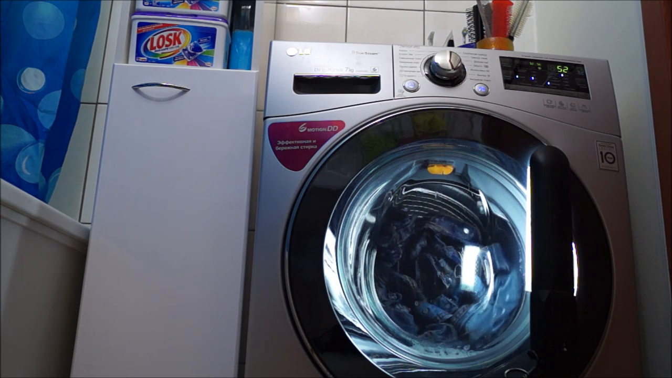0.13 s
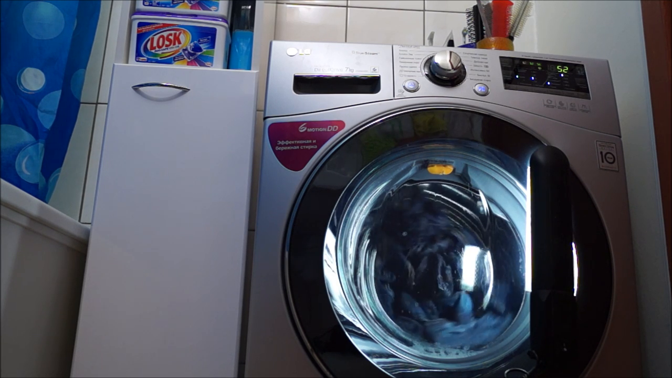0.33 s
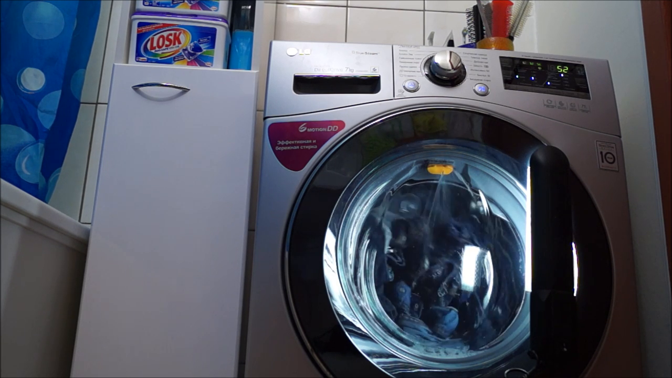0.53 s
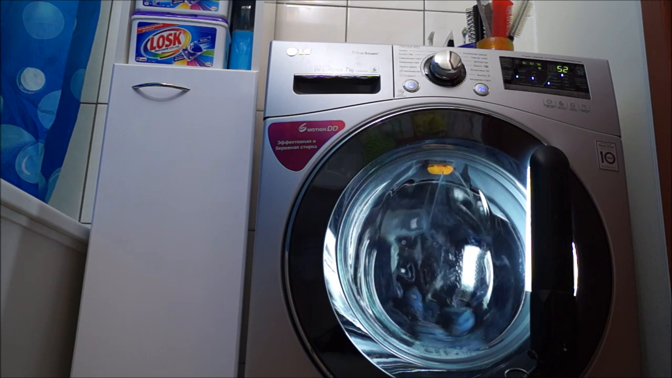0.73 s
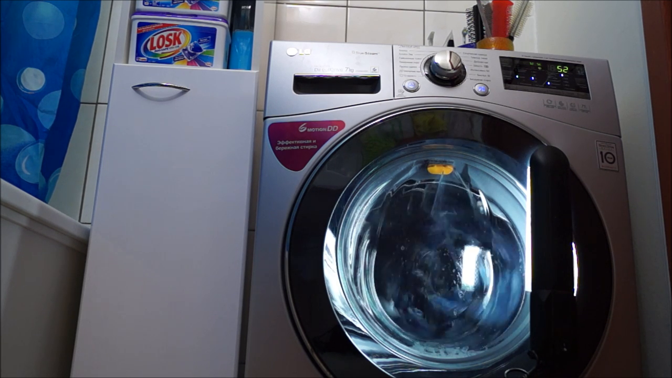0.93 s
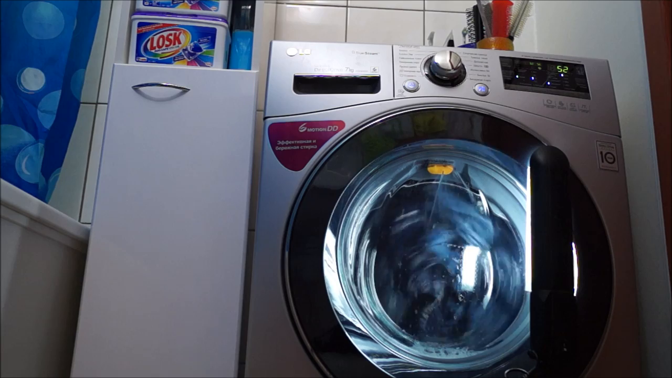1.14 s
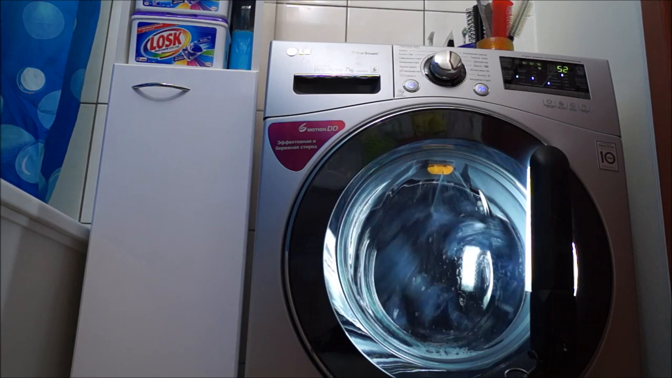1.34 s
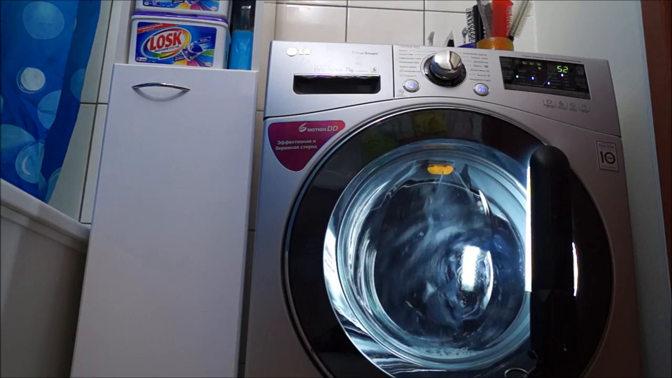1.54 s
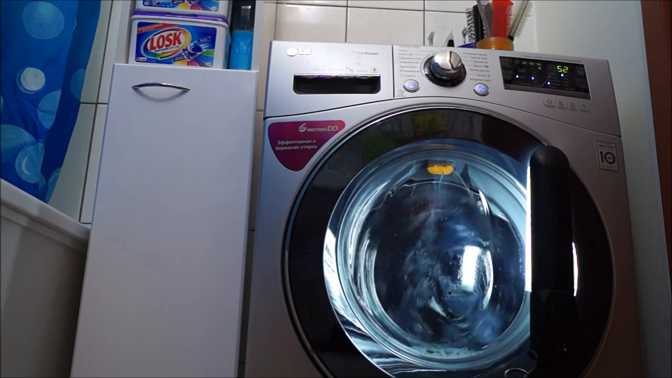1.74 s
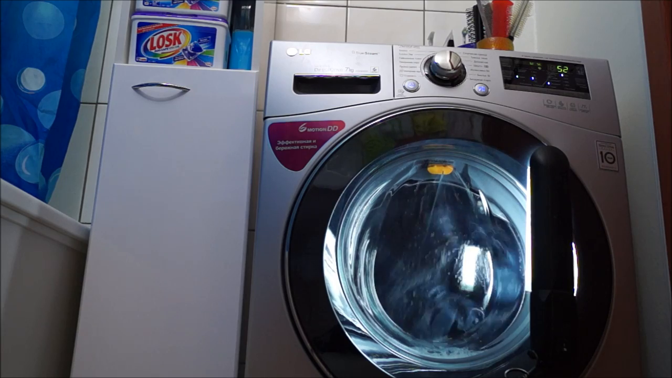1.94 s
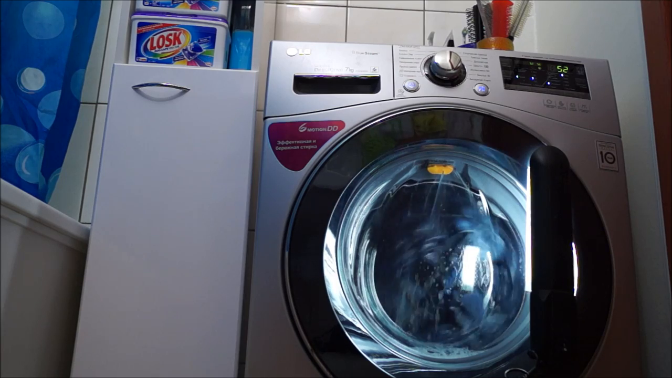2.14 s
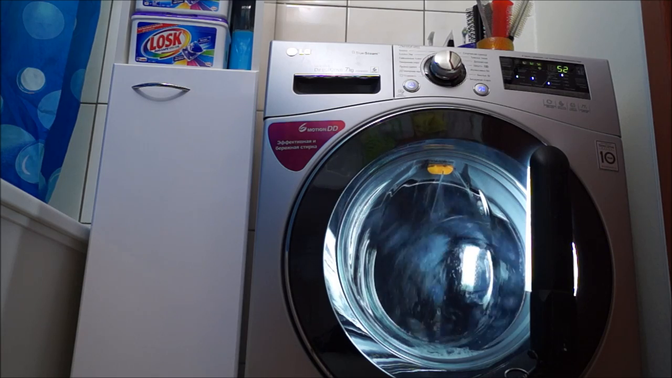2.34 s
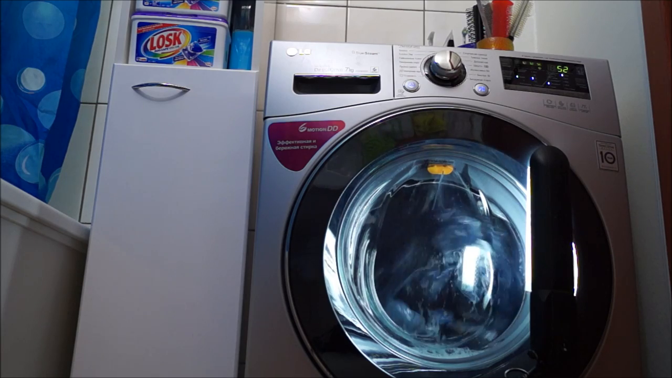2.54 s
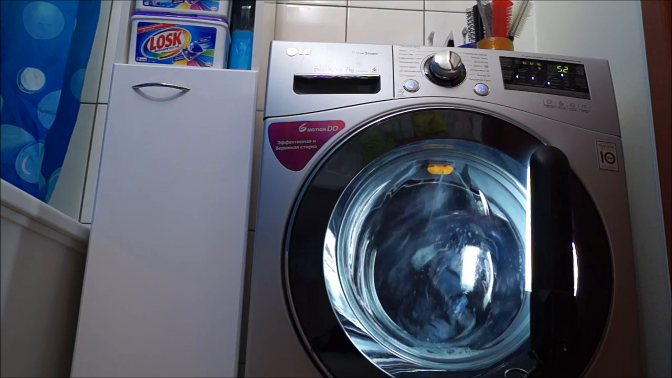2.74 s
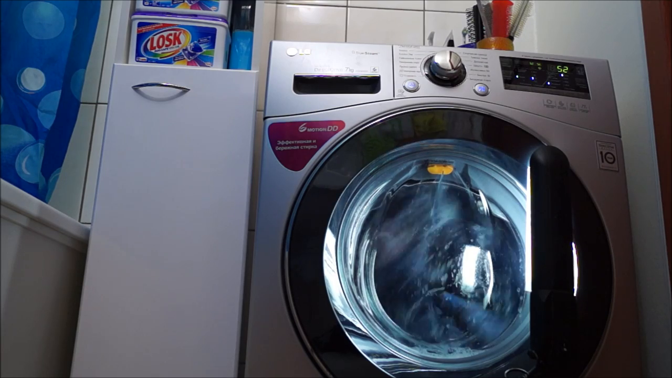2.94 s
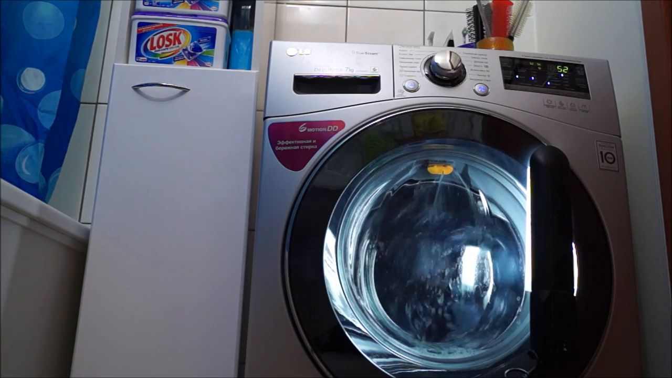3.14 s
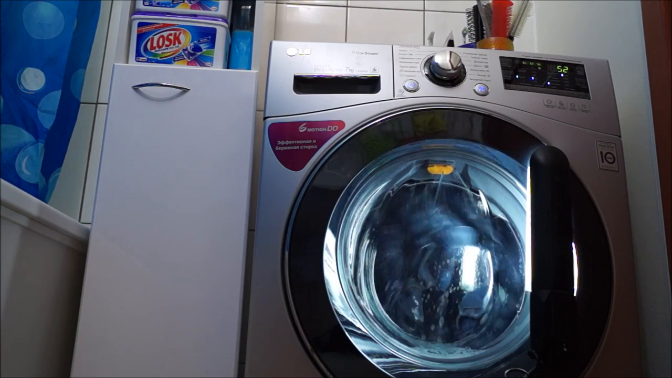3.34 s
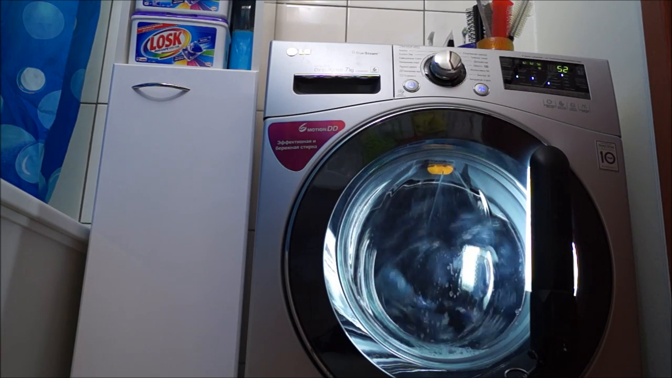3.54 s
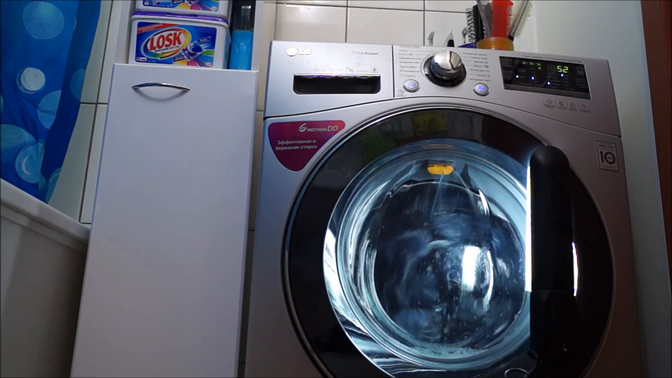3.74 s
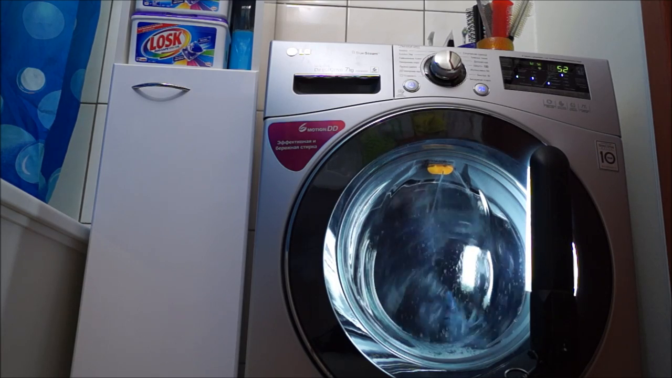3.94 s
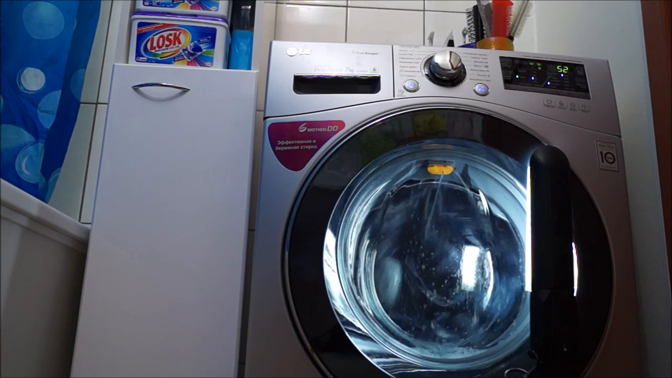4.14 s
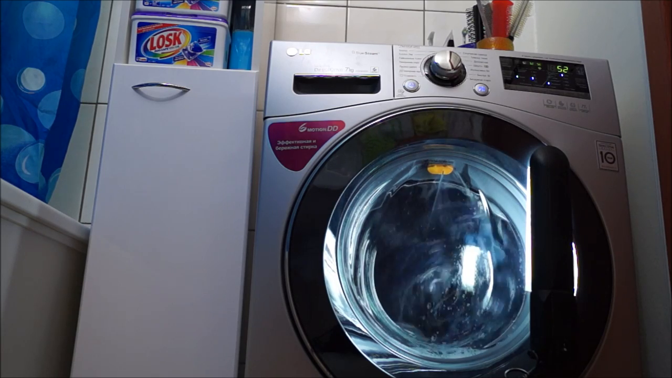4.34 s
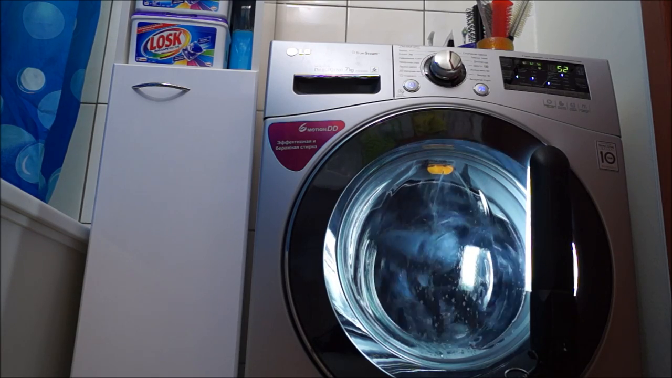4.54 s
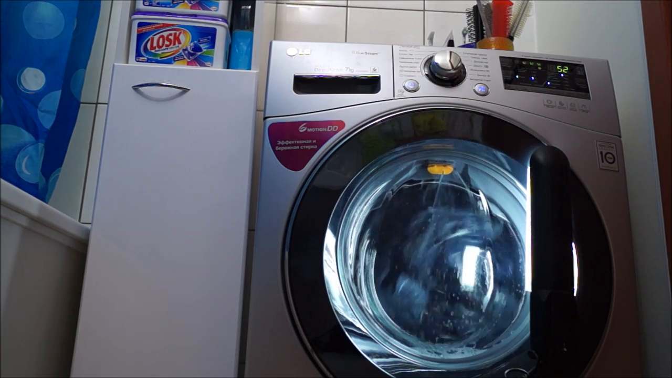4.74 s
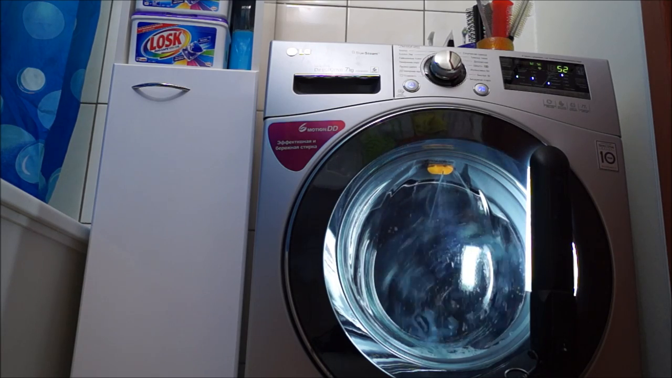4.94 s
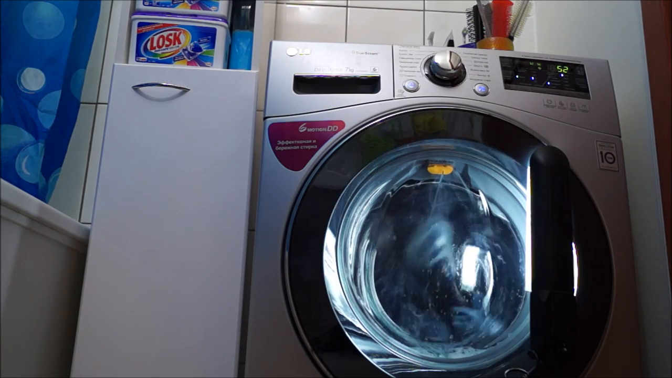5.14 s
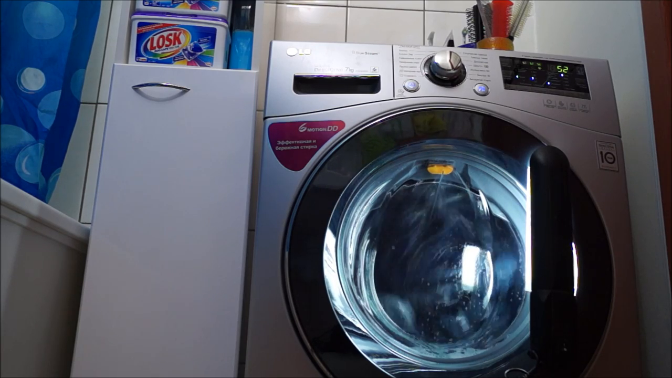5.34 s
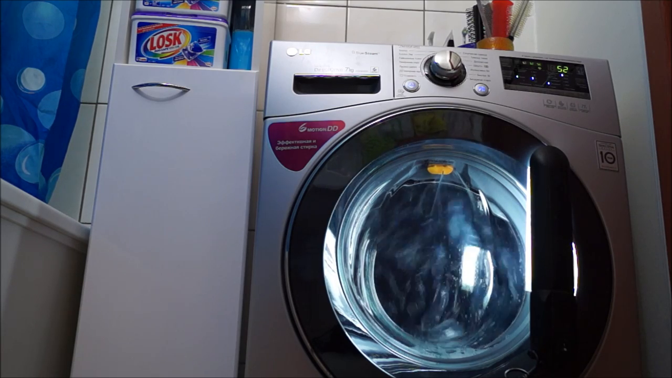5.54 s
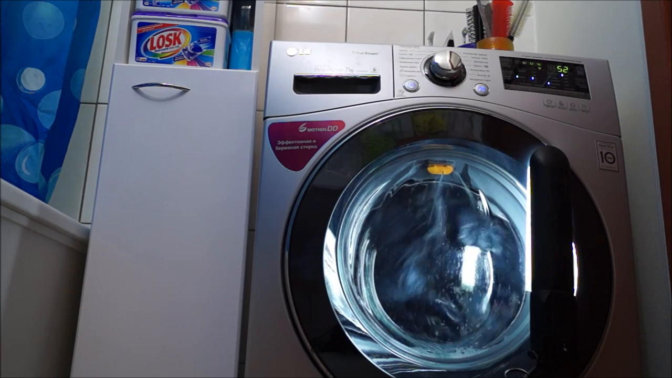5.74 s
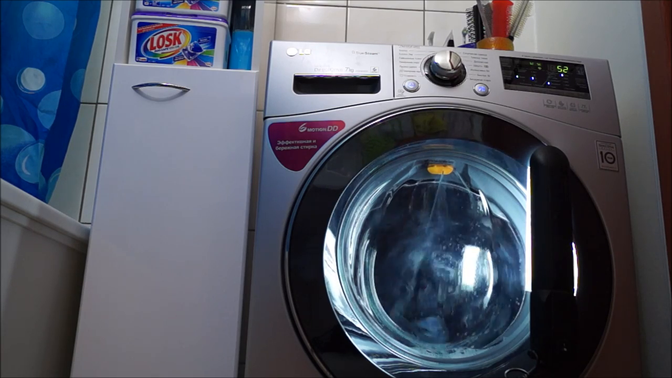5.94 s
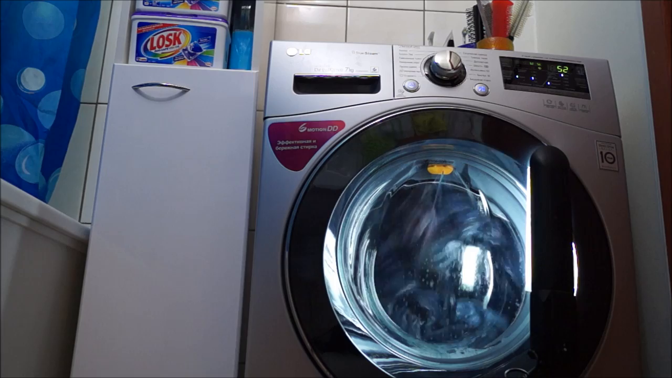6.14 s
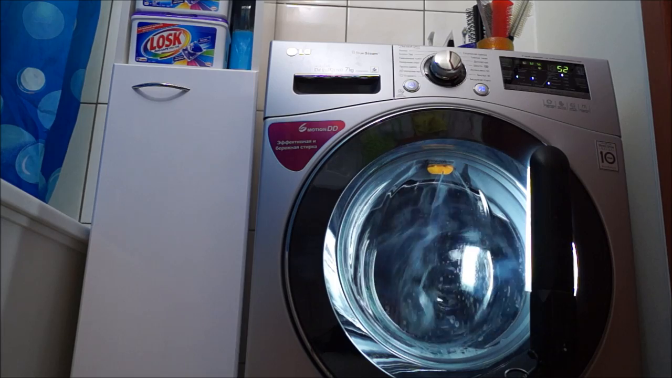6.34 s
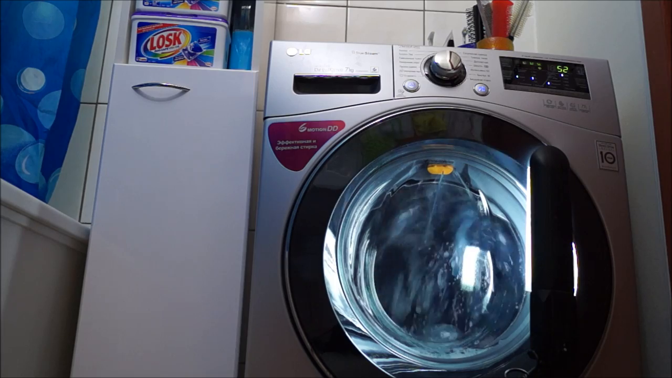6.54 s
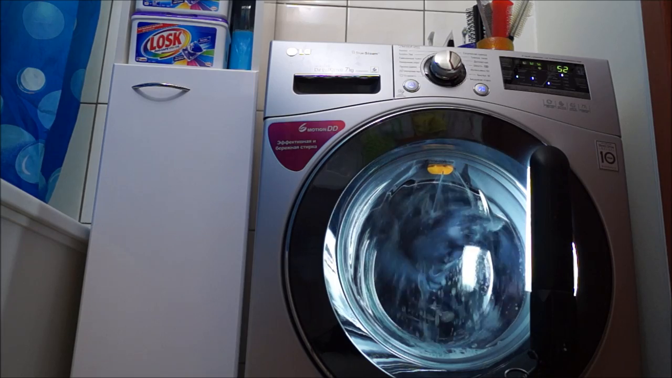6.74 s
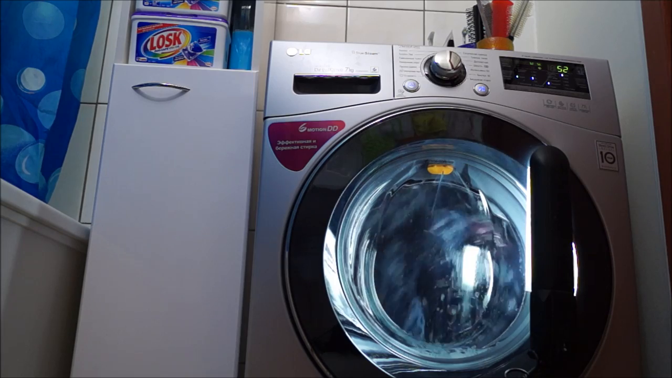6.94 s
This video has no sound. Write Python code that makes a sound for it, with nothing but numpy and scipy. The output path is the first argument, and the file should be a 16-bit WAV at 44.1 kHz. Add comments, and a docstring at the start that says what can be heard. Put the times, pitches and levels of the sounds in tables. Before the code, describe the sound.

A front-loading washing machine clacks into motion, then hums and rumbles as wet laundry thuds and sloshes, with two sharp rattling clicks on the door glass.

```python
"""A front-loading washing machine starts to tumble its load in a small tiled bathroom, heard on two microphones.
First the drum clacks and the load scrapes over the steel: noise bursts and dense slips, coloured by the drum.
As it gets going, a mains pump hums in harmonics, the drive drones as a labouring tone and noise rumbles
the tub's resonances; bundles thud down as dull bursts, while water made of noise and ringing bubbles trickles
and spray builds up. Later a metal fastener chatters on the door glass, a rattle that rings the pane's modes."""
import sys
import numpy as np
from scipy import signal
from scipy.fft import rfft, irfft, next_fast_len
from scipy.io import wavfile
from scipy.ndimage import map_coordinates

SR = 44100
rng = np.random.default_rng(int(sys.argv[2]) if len(sys.argv) > 2 else 0)


def output_pcm(signal):
    """Save a mono or channel-first signal as 16-bit PCM at the path in sys.argv[1].

    Samples are clipped to [-1, 1] before scaling.
    """
    pcm = np.clip(np.atleast_2d(signal).T, -1, 1) * 32767
    wavfile.write(sys.argv[1], SR, np.round(pcm).astype(np.int16))


N = 308259
TIME = np.arange(N) / SR

# spectrum of water sloshing through cloth: f/Hz, relative level/dB
SLOSH_COLOUR = [(300, -7), (600, 5.5), (900, 3.5), (1200, -2), (1700, -3.5), (2300, -11), (3200, -16),
                (5000, -16.5), (11000, -41)]
# spectrum of a heavy, dull blow on the machine: f/Hz, relative level/dB
THUD_COLOUR = [(35, -41), (70, -12), (105, -6), (150, -4.5), (230, -2.5), (305, 4.5), (370, -3.5), (430, 3),
               (530, 0.5), (640, -12.5), (900, -17.5), (2000, -35)]
# modes of the door glass: f/Hz, width/Hz, relative level struck at rim/dB, at centre/dB
GLASS = [(1495, 90, 0, -1.5), (1810, 59, 0, 0), (2270, 59, 7, 10), (2414, 84, -6, 7.5),
         (2600, 150, -5, -2.5), (3460, 130, -7, 10), (3585, 190, -9, 8), (3930, 220, -1, -1),
         (4350, 220, 5.5, -16), (4850, 200, 9.5, 6.5), (5100, 250, 9, 3.5), (5790, 120, 4, 6),
         (6000, 220, 5.5, 4), (6780, 190, 1.5, -10), (7450, 260, 3, 1), (7750, 200, 1, 1),
         (8800, 380, -8, -0.5), (9240, 200, 6.5, 1), (9430, 330, -2, -8), (10180, 280, -1, -0.5)]
# broad crack of the casing under the glass: f/Hz, relative level/dB
CRACK = [(400, -6), (900, 4), (1500, 7.5), (3000, 6.5), (5000, 9.5), (8000, 5.5), (11000, -3.5)]


def from_db(db):
    """Decibels to an amplitude factor."""
    return 10 ** (np.asarray(db) / 20)


def rms_one(x):
    """Scale to an RMS of one."""
    return x / np.sqrt(np.mean(x ** 2) + 1e-20)


def in_time(rows):
    """Each column of a curve at every sample."""
    s, *columns = np.transpose(rows)
    return [np.interp(TIME, s, c) for c in columns]


def at_hz(points, hz):
    """Read a spectrum on a log-frequency axis."""
    f, value = np.transpose(points)
    return np.interp(np.log(np.maximum(hz, 1)), np.log(f), value)


def drift(rate):
    """Smooth chance of spread 1, drawn through `rate` random points a second."""
    knots = rng.standard_normal(2048)
    coarse_time = TIME[::64]
    coarse = map_coordinates(knots, [coarse_time * rate], mode="wrap")
    return np.interp(TIME, coarse_time, rms_one(coarse))


def swell(middle, length, squareness=2):
    """A smooth rise and fall, above half its height for `length` seconds; the squarer, the flatter its top."""
    distance = np.minimum(np.abs(2 * (TIME - middle) / length), 8)
    return .5 ** distance ** squareness


def colour(x, spectrum):
    """Causal (minimum-phase) filter with the given spectrum."""
    size = 2 * next_fast_len(x.shape[-1] // 2 + 2048, real=True)
    gain = from_db(at_hz(spectrum, np.fft.rfftfreq(size, 1 / SR)))
    # folding the cepstrum onto positive time makes the phase minimal
    cepstrum = irfft(np.log(gain))
    cepstrum[1:size // 2] *= 2
    cepstrum[size // 2 + 1:] = 0
    return irfft(rfft(x, size) * np.exp(rfft(cepstrum)))[..., :x.shape[-1]]


def soften(x, cut_hz):
    """Second-order low-pass."""
    return signal.sosfilt(signal.butter(2, min(cut_hz, SR * .45), fs=SR, output="sos"), x)


def resonate(x, modes):
    """Parallel resonances of alternating sign."""
    out = 0
    for k, (hz, width, db) in enumerate(modes):
        r = np.exp(-np.pi * width / SR)
        top = (-1) ** k * from_db(db) * (1 - r * r) / 2
        bottom = [1, -2 * r * np.cos(2 * np.pi * hz / SR), r * r]
        out = out + signal.lfilter([top, 0, -top], bottom, x + 1e-18)
    return out


def drone(hz, gain, rough):
    """A tone of RMS `gain` with a slight tremor."""
    tremor = 1 + rough * drift(35)
    return gain * tremor * np.sqrt(2) * np.sin(2 * np.pi * np.cumsum(hz) / SR)


def burst(length):
    """A dense flurry of contacts that excites all pitches alike and fades over about `length` seconds."""
    fade = from_db(-60 * TIME[:SR // 3] / length)
    spectrum = rfft(rng.standard_normal((2, len(fade))) * fade)
    flat = irfft(spectrum / np.abs(spectrum), len(fade))
    return flat * np.minimum(10 * fade, 1)


def add(track, s, db, sound):
    """Place a sound whose energy equals that of 20 ms at the given level."""
    at = int(max(s, 0) * SR)
    energy = np.sum(sound ** 2, axis=-1, keepdims=True) / (SR / 50)
    track[:, at:at + sound.shape[-1]] += (from_db(db) * sound / np.sqrt(energy))[:, :N - at]


def blows(table, spectrum, rise_share):
    """Blows on one body, each building up over a share of its length: the softer the contact, the duller."""
    out = np.zeros((2, N))
    for s, db, length, cut_hz in table:
        contact = burst(length)
        rise = np.minimum(TIME[:contact.shape[-1]] / (rise_share * length), 1) ** 2
        add(out, s, db, soften(colour(contact * rise, spectrum), cut_hz))
    return out


def bathroom(x, wet_db, t60):
    """Direct sound and a dense tail from the tiled walls, dying away by 60 dB in `t60` seconds."""
    t = TIME[:SR // 2]
    onset = np.clip((t - .004) / .006, 0, 1)
    tail = rng.standard_normal((2, len(t))) * from_db(-60 * t / t60) * onset
    tail /= np.sqrt(np.sum(tail ** 2, axis=-1, keepdims=True))
    return x + from_db(wet_db) * signal.fftconvolve(x[:1], tail, axes=-1)[:, :N]


def spread(pair):
    """Two unrelated signals become left and right, nearly alike in the bass."""
    # likeness of the two microphone channels: f/Hz, likeness/0-1
    likeness = [(50, 0.93), (110, 1), (200, 0.93), (300, 0.93), (500, 0.77), (1000, 0.53), (2000, 0.63),
                (4000, 0.62), (9000, 0.7)]
    size = next_fast_len(pair.shape[-1], real=True)
    mid, side = rfft(pair, size)
    alike = np.clip(at_hz(likeness, np.fft.rfftfreq(size, 1 / SR)), 0, 1)
    shared = np.sqrt((1 + alike) / 2) * mid
    opposed = np.sqrt((1 - alike) / 2) * side * [[1], [-1]]
    return irfft(shared + opposed, size)[:, :pair.shape[-1]]


def pump(waver, flutter_db):
    """Mains-locked pump; the uneven water load wavers every harmonic, and a whine just above one beats with it."""
    # pump hum: multiple of the mains, median level/dB
    harmonics = [(1, -72.5), (2, -54.5), (3, -60.5), (4, -59), (6, -51.5), (7, -59), (8, -53), (9, -55.5),
                 (10, -57.5), (11, -59)]
    # whine against the pump's harmonic: t/s, beats per second/Hz
    beat_rate = [(0, 3.8), (2.1, 4.5), (4.2, 4.6), (4.3, 2.15), (7, 2.15)]
    mains_hz, beat_multiple, first_beat_s = 50, 8, .33
    whine_db, whine_flutter_db = -51.5, 6
    beats = np.cumsum(in_time(beat_rate)[0]) / SR
    beats = beats - np.interp(first_beat_s, TIME, beats)
    out = 0
    for multiple, db in harmonics:
        turns = round(multiple) * mains_hz * TIME + rng.random()
        phase = 2 * np.pi * turns + waver * drift(5)
        out = out + from_db(db + flutter_db * drift(12)) * np.sin(phase)
        if round(multiple) == beat_multiple:
            whine_gain = from_db(whine_db + whine_flutter_db * drift(7))
            out = out + whine_gain * np.sin(phase + 2 * np.pi * beats)
    return np.sqrt(2) * out


def singing_panels():
    """The churning water keeps two narrow panel resonances wavering."""
    # cabinet panels beside strong pump tones: f/Hz, width/Hz, relative level/dB
    panel_modes = [(300.3, 15.4, 0.5), (407.8, 13.8, 3)]
    wide_modes = [(hz, 5 * width, 0) for hz, width, db in panel_modes]
    churn = resonate(resonate(rng.standard_normal(N), panel_modes), wide_modes)
    return from_db(-48) * rms_one(churn)


def bubbles(per_s, size_db, cycles, count=18):
    """Bubbles of many pitches pop in clumps and ring for a few cycles."""
    sizes = from_db(size_db * np.minimum(rng.exponential(1, N), 4)) * rng.choice([-1, 1], N)
    pops = sizes * (rng.random(N) < per_s * from_db(4 * drift(8)) / SR)
    dealt = rng.integers(0, count, N)  # which pitch each pop rings
    rings = 0
    for k, hz in enumerate(np.geomspace(700, 3600, count)):
        rings = rings + resonate(pops * (dealt == k), [(hz, hz / cycles, at_hz(SLOSH_COLOUR, hz))])
    return rms_one(rings)


def water(slosh_db, spray_db, running):
    """Water surges through the cloth while fine spray hisses and patters on the glass."""
    # spectrum of spray on the glass: f/Hz, relative level/dB
    spray_colour = [(1000, -33), (2500, 6.5), (3300, 3), (4500, 3.5), (6000, 1), (8000, 1), (10500, -1.5),
                    (13000, -38)]
    slosh = rms_one(colour(rng.standard_normal((2, N)), SLOSH_COLOUR)) * from_db(1.68 * drift(16))
    pops = bubbles(per_s=500, size_db=3.0, cycles=15.3) * np.array([[1], [0]])
    fizz = bathroom(pops, wet_db=4.5, t60=0.19)
    drops = rng.standard_normal((2, N)) * (rng.random(N) < 120 / SR)  # 120 a second
    patter = rms_one(colour(bathroom(drops, wet_db=-4, t60=0.2), spray_colour))
    hiss = rms_one(colour(rng.standard_normal((2, N)), spray_colour))
    surge = from_db(slosh_db) * (from_db(1.0) * slosh + from_db(-8.5) * fizz)
    spray = from_db(spray_db) * (from_db(0.4) * hiss + from_db(-19.0) * patter)
    return np.sqrt(running) * surge + spray


def gulps():
    """A pocket of air under the cloth gurgles at an unsteady pitch."""
    # gulps under the laundry: middle t/s, level/dB, length/s
    gulp_times = [(1.28, -54, .035), (1.332, -54.5, 0.061), (1.963, -55.5, .035), (2.283, -50, 0.057),
                  (3.102, -56, .04), (6.548, -53.5, 0.056), (6.685, -56, 0.067)]
    pitch_hz, wander_hz = 666, 34.7
    gain = sum(from_db(db) * swell(s, length) for s, db, length in gulp_times)
    return drone(pitch_hz + wander_hz * drift(90), gain, rough=0.44)


def splashes():
    """Splashes are slowly rising bursts of water noise."""
    # splashes: t/s, level/dB, length/s, softness cut f/Hz
    splash_times = [(.124, -44.5, 0.063, 11100), (.47, -52, 0.15, 1410), (.503, -52.5, 0.11, 5300),
                    (.71, -69, 0.049, 1800), (1.25, -53, 0.1, 1690), (1.305, -53, 0.13, 2360),
                    (1.955, -59, 0.035, 1380), (2.922, -54, 0.072, 1800), (3.012, -56, 0.081, 1900),
                    (3.09, -50.5, 0.15, 1500), (4.22, -57, 0.081, 1497), (5.67, -52, 0.12, 1400),
                    (5.85, -55, 0.099, 1783), (6.52, -59, 0.1, 1770), (6.665, -52.5, 0.14, 4000)]
    # spectrum of a splash: f/Hz, relative level/dB
    splash_colour = [(300, -5.5), (800, 7), (1600, 2), (2600, -6.5), (4000, -2), (7000, -5.5), (11000, -11)]
    return blows(splash_times, splash_colour, rise_share=0.15)


def ticks(gain_db, length, count=40):
    """Light, bright, very short contacts: the clear ones, and faint ones at uneven gaps."""
    # clearest drops and small buttons ticking in the drum: t/s, level before gain_db/dB
    clear = [(.325, -57), (.85, -57.5), (1.092, -52.5), (1.322, -56), (1.645, -55.5), (1.695, -54),
             (2.0637, -48.5), (2.287, -51), (3.0484, -48.5), (3.221, -47), (3.4182, -49), (3.768, -51.5),
             (4.1445, -45.5), (4.4287, -45.5), (4.5584, -46.5), (4.794, -44.5), (4.9661, -49.5),
             (5.257, -51), (5.6301, -46), (5.9993, -48.5), (6.3634, -50.5), (6.6119, -47.5)]
    # spectrum of a tick: f/Hz, relative level/dB
    tick_colour = [(500, -8), (1500, 7.5), (3000, -1.5), (5000, -1.5), (8000, -1.5), (11000, -5.5)]
    faint_per_s, faint_db, faint_spread_db = 2, -55.5, 1  # level before gain_db
    out = np.zeros((2, N))
    faint_s = np.cumsum(rng.gamma(2, .5, count)) / faint_per_s
    faint_levels = faint_db + faint_spread_db * rng.standard_normal(count)
    for s, db in [*clear, *zip(faint_s, faint_levels)]:
        contact = burst(length)
        if s < TIME[-1]:
            add(out, s, db + gain_db, colour(contact, tick_colour))
    return out


def glass_knocks(scuff_db, scuff_length, damping_share):
    """A padded buckle scuffs the glass and leaves at once, so its low modes ring less damped."""
    # knocks: t/s, level/dB, length/s, f of the modes with a node at the contact point/Hz
    knock_times = [(3.014, -53, .1, 2800), (4.191, -54, 0.07, 2110), (5.166, -47.5, 0.083, 2850)]
    cut_hz, db_per_octave = 3200, -11.5
    node_db, node_octaves = -19, 0.22
    out = np.zeros((2, N))
    hz, width, _, centre = np.transpose([mode for mode in GLASS if mode[0] < cut_hz])
    for s, db, length, node_hz in knock_times:
        tilt = db_per_octave * np.log2(hz / hz[0])
        notch = node_db * np.exp(-(np.log2(hz / node_hz) / node_octaves) ** 2)
        modes = zip(hz, damping_share * width, centre + tilt + notch)
        add(out, s, db, soften(resonate(burst(length), modes), cut_hz))
        add(out, s, db + scuff_db, soften(colour(burst(scuff_length), CRACK), cut_hz))
    return out


def chatter(length, count=3):
    """A few sharp bounces on top of a rattle that fades over about `length` seconds."""
    gap_s, bounce_length_s = .004, 0.014
    first_db, loss_db = -10, 0.5  # against the rattle; loss at each bounce
    out = rms_one(burst(length))
    for k in range(count):
        bounce = np.roll(rms_one(burst(bounce_length_s)), int(k * gap_s * SR), axis=-1)
        out = out + from_db(first_db - loss_db * k) * bounce
    return out


def glass_clicks(crack_db, crack_length, door_db, door_length):
    """The fastener chatters on the glass: modes weighted by place, a broad crack, and a low bump of the door."""
    # fastener on the glass: t/s, level/dB, length/s, softness cut f/Hz, place from rim 0 to centre 1
    click_times = [(3.017, -60, 0.04, 4150, .1), (4.276, -62, 0.0085, 9020, .1),
                   (4.2946, -32, 0.057, 13500, .03), (5.3047, -29.5, 0.11, 13970, 1),
                   (6.655, -50, 0.11, 7470, 0.73)]
    out = np.zeros((2, N))
    hz, width, rim, centre = np.transpose(GLASS)
    for s, db, length, cut_hz, place in click_times:
        level = rim + np.clip(place, 0, 1) * (centre - rim)
        add(out, s, db, soften(resonate(chatter(length), zip(hz, width, level)), cut_hz))
        add(out, s, db + crack_db, soften(colour(burst(crack_length), CRACK), cut_hz))
        add(out, s, db + door_db, colour(burst(door_length), THUD_COLOUR))
    return out


def scrape(slips_per_s, uneven_db):
    """Dense, uneven slips of the load over the steel as the drum breaks away."""
    # spectrum of the scrape: f/Hz, relative level/dB
    scrape_colour = [(300, -5), (900, 3), (1900, 2), (2600, -1), (4200, -2), (5200, -11), (7000, -13),
                     (11000, -15)]
    middle_s, length_s, level_db = .118, .085, -52
    slips = rng.standard_normal((2, N)) * (rng.random(N) < slips_per_s / SR)
    slips = slips * from_db(uneven_db * drift(148.6))
    envelope = swell(middle_s, length_s, squareness=3)
    return from_db(level_db) * envelope * rms_one(colour(slips, scrape_colour))


def clacks(ring_width_hz, ring_split_hz):
    """Each clack is a broad knock with a short ring from a close pair of the steel drum's modes."""
    # drum and load against the tub: t/s, level/dB, length/s, softness cut f/Hz, ring f/Hz, ring level/dB
    clack_times = [(0.0574, -45, 0.068, 7450, 4100, -48.5), (0.081, -43.5, 0.11, 6500, 4000, -56),
                   (0.125, -52, 0.13, 7500, 3700, -59), (2.237, -45, 0.061, 2400, 3850, -63),
                   (2.24, -40, 0.12, 2230, 3890, -62), (2.265, -47, 0.2, 1900, 3800, -70),
                   (3.411, -53.5, 0.042, 1700, 3733, -73)]
    # spectrum of the knock: f/Hz, relative level/dB
    clack_colour = [(40, -10), (200, 0), (450, 1.5), (800, 2), (1100, -2.5), (1400, 0), (1850, -3),
                    (2400, -8), (2950, -11), (3200, -15), (3600, -4), (4400, -11), (4800, -13), (5400, -17),
                    (6700, -8.5), (11000, -22)]
    out = blows([row[:4] for row in clack_times], clack_colour, rise_share=0.034)
    for s, _, length, _, hz, db in clack_times:
        pair = [(hz - ring_split_hz / 2, ring_width_hz, 0), (hz + ring_split_hz / 2, ring_width_hz, 0)]
        add(out, s, db, resonate(burst(length), pair))
    return out


def landings():
    """Every wet bundle gives two blows: its bulk, then its trailing fold, weaker, longer and duller."""
    # wet laundry landing: t/s, level/dB, length/s, softness cut f/Hz
    bulks = [(0.132, -45, 0.13, 800), (.317, -42.5, 0.07, 750), (1.064, -35.5, .11, 1100),
             (1.125, -41.5, 0.15, 900), (1.269, -37.5, 0.089, 1000), (1.478, -48, 0.054, 690),
             (2.015, -39.5, 0.098, 380), (2.245, -36.5, 0.13, 650), (2.867, -42.5, 0.046, 480),
             (3.013, -32.5, 0.081, 497), (3.13, -39.5, 0.12, 600), (4.048, -36, 0.19, 325),
             (4.19, -29.5, 0.06, 640), (4.222, -34, 0.034, 520), (5.174, -36.5, 0.055, 598),
             (6.144, -44, 0.054, 700), (6.662, -43.5, 0.21, 437)]
    delay_s, loss_db, stretch, cut_share = .036, 3.5, 1.6, 0.76
    folds = [(s + delay_s, db - loss_db, length * stretch, cut_hz * cut_share)
             for s, db, length, cut_hz in bulks]
    return blows(bulks + folds, THUD_COLOUR, rise_share=0.078)


def boom(running):
    """The tub's one-pitch boom is faint all the time and swells with every shift of the load."""
    # the load shifts: middle t/s, level/dB
    shifts = [(.23, -48), (1.49, -46.5), (1.73, -50), (2.03, -43.5), (2.89, -49), (3.085, -35.5),
              (4.09, -43), (4.3, -49), (4.551, -47), (4.92, -44.5), (5.33, -37), (6.69, -39)]
    pitch_hz, pitch_wander_hz = 116.4, 2.54
    faint_db, wander_db, swell_s = -57, 4, 0.12
    gain = running * from_db(faint_db + wander_db * drift(5.3))
    gain = gain + sum(from_db(db) * swell(s, swell_s) for s, db in shifts)
    return drone(pitch_hz + pitch_wander_hz * drift(7), gain, rough=0.3)


def rumble(lumpy_db, broad_db):
    """The rolling load shakes tub and panels; the deepest modes ebb each time the drum lifts it."""
    # tub and cabinet resonances: f/Hz, width/Hz, relative level/dB
    tub_modes = [(62.7, 3.7, -11), (92.5, 8.8, 5.5), (112.8, 15.2, 2.5), (129.3, 10.6, 4.5), (165, 13.8, 0),
                 (203.6, 12.1, 4.5), (266.3, 22, 0.5), (290.5, 9.9, 4), (319.5, 8.7, 2.5), (334, 20, -4.5),
                 (417, 43, 4), (431.5, 10.2, 9), (464.1, 4.9, 2), (493, 18.2, 1.5), (528.4, 20, -2),
                 (548, 20.3, -4), (582.4, 22, -6.5), (656, 16, -10.5), (750, 22, -15), (839, 9.3, -9)]
    turn_s, lift_s, deep_hz, ebb_db = 1.3, 2.5, 140, 0.5
    shaking = rng.standard_normal((2, N)) * from_db(lumpy_db * drift(25))
    ebb = from_db(-ebb_db * np.cos(2 * np.pi * (TIME - lift_s) / turn_s))
    deep = resonate(shaking * ebb, [mode for mode in tub_modes if mode[0] < deep_hz])
    panels = resonate(shaking, [mode for mode in tub_modes if mode[0] >= deep_hz])
    broad = from_db(broad_db) * colour(rng.standard_normal((2, N)), THUD_COLOUR)
    # the cabinet is too small to radiate the deepest bass
    high_pass = signal.butter(4, 62, "high", fs=SR, output="sos")
    return rms_one(signal.sosfilt(high_pass, deep + panels + broad))


def drive(running):
    """A faint wandering drone; each effort swells it and draws it along a glide of its own."""
    # the drive labours: middle t/s, level/dB, length/s, f/Hz, glide/Hz per s
    efforts = [(0.15, -42.5, 0.056, 160, 150), (0.377, -49.5, 0.16, 156, 64), (0.772, -52, .07, 166, 0),
               (0.957, -49, 0.081, 160, 2), (1.09, -32.8, .155, 164, 90), (2.328, -43.5, .17, 155, -23),
               (2.54, -48, 0.16, 151, 20), (2.957, -48, 0.15, 170, 0), (3.752, -43.5, 0.29, 157.5, -2),
               (4.229, -46.5, 0.135, 169, 35), (5.037, -44.5, .24, 163.5, 0), (5.6, -48, 0.12, 165, 0),
               (6.423, -44.5, .35, 168, 15), (6.892, -46.5, .2, 157, 0)]
    idle_hz, wander_hz = 165, 5.87
    idle_db, wander_db, flutter_db = -57, 3.5, 2
    gain = running * from_db(idle_db + wander_db * drift(6))
    pull = gain * (idle_hz + wander_hz * drift(5))
    for s, db, length, hz, glide in efforts:
        effort = from_db(db) * swell(s, length, squareness=3.78)
        gain = gain + effort
        pull = pull + effort * (hz + glide * (TIME - s))
    # the pitch is the mean of all pitches, weighted by their gains
    return drone(pull / gain, gain * from_db(flutter_db * drift(14)), rough=0.1)


def scene():
    """Tones come from the centre; noises and blows are built as centre and side, then spread left and right."""
    # the wash: t/s, rumble level before trim and running gain/dB, slosh level likewise/dB
    wash = [(0.2, -40.5, -53), (0.24, -48, -62.5), (1.71, -45.5, -62), (2.13, -44.5, -60.5),
            (2.54, -46, -62), (3.28, -43, -59), (3.92, -44, -61.5), (4.19, -42, -59), (5.7, -41, -59),
            (6.19, -43.5, -59.5), (6.61, -40, -57.5), (6.99, -44, -60.5)]
    # spin-up of the drum: t/s, running gain/dB
    spin_up = [(0, -32.5), (.05, -19.5), (.13, -0.5), (.2, -2.5)]
    rumble_db, slosh_db = in_time(wash)
    running = from_db(in_time(spin_up)[0])
    # spray builds up steadily for 3.3 s, then holds
    spray_db = np.interp(TIME, [0, 3.3], [-74.5, -69.5])

    hum = running * (pump(waver=0.3, flutter_db=3.5) + singing_panels())
    wet = water(slosh_db, spray_db, running)
    clicks = glass_clicks(crack_db=-6.0, crack_length=0.22, door_db=-12.5, door_length=.09)
    clicks = bathroom(clicks + ticks(gain_db=-10.0, length=0.11), wet_db=-9, t60=0.28)
    contacts = clacks(ring_width_hz=240, ring_split_hz=270) + scrape(slips_per_s=2500, uneven_db=4)
    contacts = contacts + glass_knocks(scuff_db=-12, scuff_length=0.09, damping_share=0.42)
    knocks = bathroom(contacts + splashes(), wet_db=-5.5, t60=0.18)
    thuds = bathroom(landings(), wet_db=-4.5, t60=0.15)
    tub = running * from_db(rumble_db + 2.0) * rumble(lumpy_db=1.5, broad_db=-18.5)
    tones = drive(running) + boom(running) + gulps()
    balance = from_db([[-.3], [.3]])  # left, right
    return (tones + hum + spread(tub + wet + thuds + knocks + clicks)) * balance


def record(dry):
    """Standing waves reach the two microphones out of step; the top is cut steeply."""
    # phase between the microphones: f/Hz, lead of the left/rad
    left_lead = [(95, 0), (118, 0.17), (150, -0.047), (168, 0.23), (200, 0.073), (300, 0.063), (400, 0.36),
                 (450, .3), (520, -0.12), (860, -0.12), (1550, 0.12), (2400, 0.12)]
    cutoff_hz = 11160
    size = next_fast_len(N + 2048, real=True)
    lead = at_hz(left_lead, np.fft.rfftfreq(size, 1 / SR))
    turn = np.exp(.5j * lead * [[1], [-1]])  # half the lead on each side
    heard = irfft(rfft(dry, size) * turn, size)[:, :N]
    return signal.sosfilt(signal.ellip(12, .2, 80, cutoff_hz, fs=SR, output="sos"), heard)


dry = scene()
out = record(dry)
output_pcm(out)
```